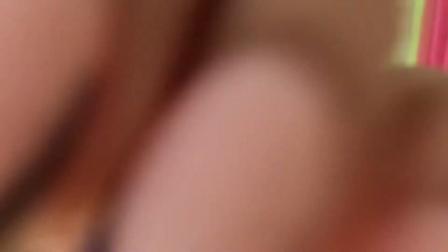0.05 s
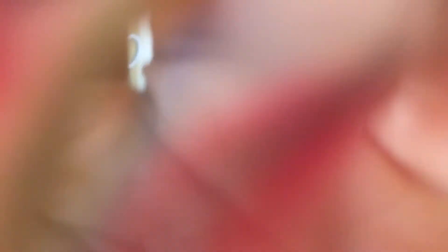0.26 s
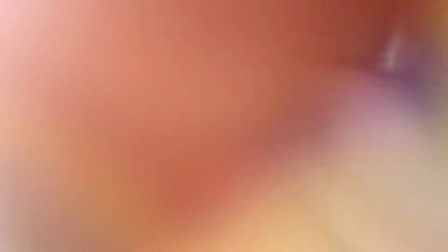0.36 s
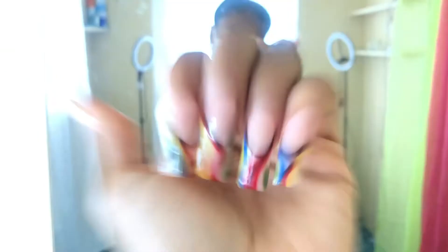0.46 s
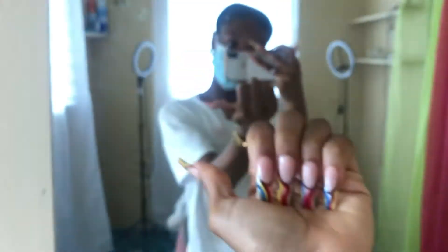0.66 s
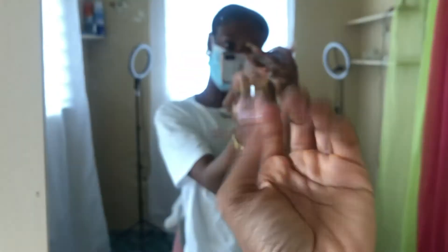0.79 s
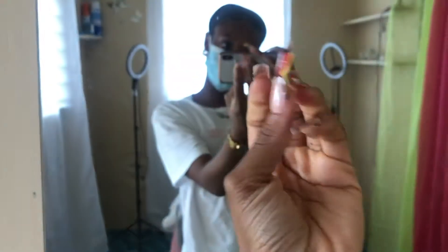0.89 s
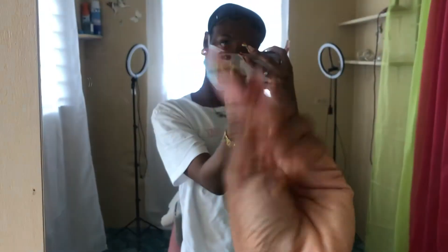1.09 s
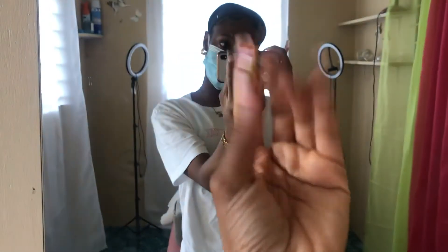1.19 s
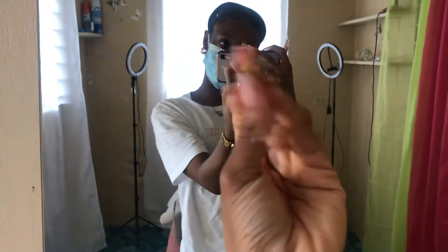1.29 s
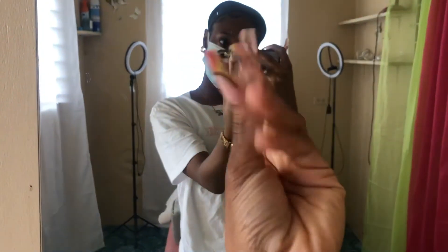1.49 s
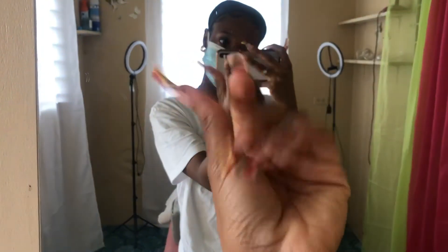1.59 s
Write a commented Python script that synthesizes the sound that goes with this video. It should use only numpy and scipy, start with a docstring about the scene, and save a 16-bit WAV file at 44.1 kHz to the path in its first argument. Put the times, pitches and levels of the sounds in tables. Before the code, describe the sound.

Long hard nails knock a phone in two rapid bursts, very close and clipping with low thuds and brief rubbing, then click sharply against each other in a small room over faint hiss and hum.

```python
"""Acrylic nails on a phone

Long nails knock and brush on a phone in two quick flurries, then click against each other in front of it.
Damped modes and noise make each crack; firmer knocks add dispersive bending waves in the phone body.
Airborne clicks leave a bright decaying-noise room tail; filtered noise gives the sliding and rocking,
and the background of rising hiss, low fan hum and faint narrow whistles."""
import sys
import numpy as np
from scipy import signal
from scipy.fft import rfft, irfft
from scipy.io import wavfile
from scipy.ndimage import uniform_filter1d

SR = 44100
rng = np.random.default_rng(int(sys.argv[2]) if len(sys.argv) > 2 else 0)


def to_wav(s):
    """Save 16-bit WAV."""
    ch = np.atleast_2d(s).T  # columns
    pcm = np.round(np.clip(ch, -1, 1) * 32767)  # PCM
    wavfile.write(sys.argv[1], SR, pcm.astype(np.int16))


N = 72765


def amp(db):
    """Decibel law: 20 dB is a factor of ten in amplitude."""
    return 10 ** (np.asarray(db) / 20)


def evened(x):
    """Normalisation to unit root-mean-square."""
    return x / np.sqrt(np.mean(x ** 2) + 1e-20)


def read(points, hz):
    """Interpolation of a curve along a logarithmic frequency axis."""
    point_hz, value = np.transpose(points)
    return np.interp(np.log(hz + 1), np.log(point_hz + 1), value)


def level(curve):
    """Envelope: amplitude over time from straight lines in decibels."""
    s, db = np.transpose(curve)
    return amp(np.interp(np.arange(N) / SR, s, db))


def add(mix, s, sound):
    """Superposition: a sound sums into the mix from a start in seconds, cut at the end."""
    part = mix[max(round(s * SR), 0):][:len(sound)]
    part += sound[:len(part)]


def noise(colour):
    """Spectral shaping: white noise weighted to a given spectrum, at unit rms."""
    spectrum = rfft(rng.standard_normal(N))
    weight = amp(read(colour, np.fft.rfftfreq(N, 1 / SR)))
    return evened(irfft(spectrum * weight, N))


# Spectrum of the background hiss. Each row: frequency in Hz, relative level in dB.
HISS_SPECTRUM = [(180, -26), (300, 1.5), (456, -2), (504, -6), (793, -4.5), (1600, -10), (2840, -15),
                 (3140, -16), (14400, -26), (16500, -31.5)]
HISS_START_DB, HISS_RISE_DB = -61, 5  # rms level at the start, and its rise by the end


def hiss():
    """Stationary broadband noise under a slowly rising envelope."""
    return level([(0, HISS_START_DB), (N / SR, HISS_START_DB + HISS_RISE_DB)]) * noise(HISS_SPECTRUM)


# Spectrum of a distant fan's rumble. Each row: frequency in Hz, relative level in dB.
HUM_SPECTRUM = [(15, -68.5), (25, -32.5), (40, -21.5), (59, 3.5), (92, -2.5), (118, 3.5), (178, -7.5),
                (292, -11.5), (348, -19.5), (377, -15), (400, -23), (520, -49), (880, -120)]
# Loudness of the rumble. Each row: time in seconds, rms level in dB.
HUM_LEVEL = [(0, -64), (.15, -61.5), (.5, -62.5), (.65, -59), (.78, -52), (1.2, -50), (1.65, -52)]


def fan_hum():
    """Low-frequency noise with spectral peaks: the rumble of a distant fan."""
    return level(HUM_LEVEL) * noise(HUM_SPECTRUM)


# Faint narrow whistles. Each row: start in seconds, length in seconds, centre in Hz, width of the
# resonator poles in Hz, rms level before the swell in dB.
WHISTLES = [(.45, .28, 2650, 380, -62), (1., .1, 2800, 40, -58), (1.13, .17, 2450, 120, -63),
            (1.13, .1, 2780, 100, -64), (1.46, .24, 2830, 200, -60), (1.53, .14, 2400, 60, -62),
            (.52, .11, 5800, 300, -62), (.222, .025, 1750, 250, -43)]


def whistles():
    """Narrow-band modulation: low-passed complex noise shifted up to a carrier, swelling and fading."""
    out = np.zeros(N)
    for s, length, hz, width, db in WHISTLES:
        t = np.arange(0, length, 1 / SR)
        pole = np.exp(-np.pi * width / SR)
        complex_noise = rng.standard_normal((N, 2)) @ [1, 1j]
        # the end of the filtered noise is taken, clear of the filter's onset
        fuzz = signal.lfilter([1], [1, -2 * pole, pole * pole], complex_noise)[-len(t):]
        whistle = evened((fuzz * np.exp(2j * np.pi * hz * t)).real)
        swell = np.sin(np.pi * t / length) ** 0.21
        add(out, s, amp(db) * whistle * swell)
    return out


# Spectrum of the case rocking in the hand. Each row: frequency in Hz, relative level in dB.
ROCKING_SPECTRUM = [(25, -14), (50, -0.5), (100, -7.5), (190, -0.5), (280, -4), (500, -42)]
# Strength of the rocking. Each row: time in seconds, rms level in dB.
ROCKING_LEVEL = [(0.17, -51.5), (0.188, -62), (0.226, -27.5), (0.276, -85), (0.314, -76), (0.36, -29.5),
                 (0.398, -26), (0.458, -44.5), (0.502, -104), (0.52, -55)]


def rocking():
    """Low-frequency rigid motion of the case in the hand, as enveloped noise."""
    curve = [(0.035, -104)] + list(ROCKING_LEVEL) + [(.56, -99)]
    return level(curve) * noise(ROCKING_SPECTRUM)


# Spectrum of skin and nail sliding on the case. Each row: frequency in Hz, relative level in dB.
RUB_SPECTRUM = [(120, -20.5), (200, -8.5), (909, -10), (1270, -11.5), (1730, -6.5), (2050, -12.5),
                (3630, -12), (7060, -7.5), (15000, -27.5), (16500, -37.5)]
# Strength of the sliding. Each row: time in seconds, rms level in dB.
RUB_LEVEL = [(0, -46), (.06, -64.5), (.12, -99), (.205, -60.5), (.214, -34), (.221, -47.5), (.224, -35.5),
             (.256, -40), (.29, -57), (.345, -65.5), (.36, -39), (.4, -34), (.425, -41), (.445, -52),
             (.5, -74.5)]
RUB_GRAIN_DB = 1.5  # rms depth of the level flutter


def rub():
    """Friction noise: sliding of skin and nail on the case, roughened by random amplitude modulation."""
    grain = evened(uniform_filter1d(rng.standard_normal(N), size=60))
    return level(RUB_LEVEL) * evened(noise(RUB_SPECTRUM) * amp(RUB_GRAIN_DB * grain))


# Decay of the room. Each row: frequency in Hz, time to fall by 60 dB in seconds.
ROOM_T60 = [(2000, 0.23), (6000, 0.25), (14000, 0.19)]
# Colour of the room tail at its start. Each row: frequency in Hz, relative level in dB.
ROOM_COLOUR = [(1000, -20.5), (2000, -10), (4500, -5), (8000, -5), (12000, 0), (15500, -9), (16500, -23.5)]
ROOM_DB = 1.85  # root of the tail's summed squares
ROOM_TINT = .6  # how far the tail tilts toward the crack's pitch


def room_tail(crack_hz):
    """Diffuse reverberation: noise whose bands decay exponentially, tilted toward the crack's pitch."""
    hz, t, bands = signal.stft(rng.standard_normal(SR // 3), SR, nperseg=128)
    tilt = ((hz + 1) / 8000) ** (ROOM_TINT * np.log2(crack_hz / 8000))
    decay_db = 60 * t / read(ROOM_T60, hz)[:, None]
    gain = amp(read(ROOM_COLOUR, hz)[:, None] - decay_db)
    tail = signal.istft(bands * tilt[:, None] * gain, SR, nperseg=128)[1]
    return amp(ROOM_DB) * tail / np.linalg.norm(tail)


TICK_RISE_MS, TICK_FADE = 0.037, 1.3  # rise time constant; decay time constant per tabled length
TICK_OCT = 0.62  # spread in octaves of the excitation about the crack's centre
TICK_NOISE_DB, CHATTER_DB, CHATTER_MS = -6.5, -18.5, 0.98  # noise in the crack; longer chatter and its decay
CRACK_LOW_HZ = 1250  # high-pass corner


def tick(db, hz, length_ms, modes):
    """Modal impact: the struck thing's modes near the crack's centre ring briefly over noisy chatter."""
    ms, f = np.arange(512) * 1000 / SR, np.fft.rfftfreq(512, 1 / SR) + 1
    shape = (1 - np.exp(-ms / TICK_RISE_MS)) * np.exp(-ms / (TICK_FADE * length_ms))

    def near(at_hz):
        """Excitation spectrum: a Gaussian in octaves over a small floor."""
        return np.exp(-.5 * (np.log2(at_hz / hz) / TICK_OCT) ** 2) + 0.14

    mode_hz, mode_db = np.transpose(modes)[:, :, None]
    # each strike shifts the modes' pitch, phase and level at random
    detune, phase, sway = rng.standard_normal((3, len(modes), 1))
    turns = mode_hz * (1 + 0.056 * detune) * ms / 1000 + phase
    mode_gain = near(mode_hz) * amp(mode_db + 4.4 * sway)
    ring = (mode_gain * np.sin(2 * np.pi * turns)).sum(0)
    grit = evened(irfft(rfft(rng.standard_normal(512)) * near(f) * amp(read(modes, f)), 512))
    crack = shape * (evened(ring) + amp(TICK_NOISE_DB) * grit)
    crack = crack + amp(CHATTER_DB) * np.exp(-ms / CHATTER_MS) * grit
    crack = signal.lfilter(*signal.butter(2, CRACK_LOW_HZ, "high", fs=SR), crack)
    return amp(db) * crack / abs(crack).max()


ROOM_GAP_MS = 1  # room tail's delay after the tabled start


def cracks(table, modes):
    """Direct and reverberant field: all cracks of a table, and apart from them a room tail for each."""
    dry, wet = np.zeros((2, N))
    for s, db, hz, length_ms in table:
        add(dry, s + .0001, tick(db, hz, length_ms, modes))
        # a longer crack feeds the room more energy
        add(wet, s + ROOM_GAP_MS / 1000, amp(db) * np.sqrt(length_ms) * room_tail(hz))
    return dry, wet


# Nail striking nail in the air. Each row: start in seconds, peak level in dB, centre in Hz,
# length scale in ms.
CLICKS = [(0.5425, -25, 9300, 0.74), (0.5446, -22, 9000, 0.28), (0.5461, -32, 7600, 0.3),
          (0.5651, -38, 5800, 1.02), (0.5755, -38, 6500, 0.45), (0.6143, -35, 8000, 0.33),
          (0.6254, -44, 6600, 0.29), (0.6391, -38, 8100, 0.4), (0.8687, -23, 8800, 0.29),
          (0.8778, -10, 11000, 0.35), (0.879, -21, 10700, 0.3), (0.8818, -28, 9000, 0.51),
          (0.8836, -28, 10800, 0.53), (1.097, -8, 9500, 0.29), (1.0992, -12, 6800, 0.33),
          (1.1006, -19, 7700, 0.31), (1.1095, -17, 10500, 0.27), (1.1222, -21, 8500, 0.37),
          (1.1263, -13, 7200, 0.56), (1.1277, -23, 7300, 0.29), (1.306, -10, 7900, 0.31),
          (1.3186, -24, 7200, 0.5), (1.3455, -21, 10600, 0.55), (1.3478, -6, 10500, 0.56),
          (1.3493, -13, 10800, 0.3), (1.352, -11, 7400, 0.43), (1.3666, -26, 10400, 0.58)]
# Resonances of the nails. Each row: frequency in Hz, relative level in dB.
NAIL_MODES = [(2600, -8), (4800, 2), (7200, -1.5), (9400, -5.5), (12000, 2.5), (14500, -4)]


def air_clicks():
    """Airborne radiation: nail on nail, heard with its full room tail."""
    direct, room = cracks(CLICKS, NAIL_MODES)
    return direct + room


WAVE_LAW = .6  # exponent of phase against time
WAVE_ABOVE_OCT, WAVE_BELOW_OCT = 1.1, .13  # spread above and below the strongest pitch, in octaves
REBOUND_DB, REBOUND_SHARE = -10, .42  # rebound level; its pitch as a share of the strongest pitch


def body_wave(db, crest_ms, hz):
    """Bending-wave dispersion: treble arrives first, pitch falls as the swing grows; a rebound follows."""
    ms = np.arange(1, 3000) * 1000 / SR
    turns = 2 * (ms / crest_ms) ** WAVE_LAW
    pitch_hz = WAVE_LAW * turns / ms * 1000
    octaves = np.log2(pitch_hz / hz)
    swing = np.exp(-.5 * (octaves / np.where(octaves > 0, WAVE_ABOVE_OCT, WAVE_BELOW_OCT)) ** 2)
    after_ms = np.maximum(ms - ms[np.argmax(swing)], 0)
    rebound = -amp(REBOUND_DB) * np.exp(-after_ms / (3.0 * crest_ms))
    rebound = rebound * np.sin(2 * np.pi * REBOUND_SHARE * hz * after_ms / 1000)
    return amp(db) * (swing * np.cos(2 * np.pi * turns) + rebound)


# Bending waves after the firmer knocks. Each row: start in seconds, level in dB, time to the second
# crest in ms, strongest pitch in Hz, sign (1 for a push, -1 for a pull).
WAVES = [(.0, -33, 2.5, 500, 1), (.2073, -16, 1.1, 1200, 1), (.2123, -21, 1.5, 700, 1),
         (.2225, -24, 3.2, 420, -1), (.2457, -27, 1.2, 900, 1), (.2645, -36, 2.5, 600, 1),
         (.3546, -9, 1.6, 750, 1), (.3582, -5, 1.8, 700, 1), (.3594, -15, 1.0, 1500, -1),
         (.3654, -12, 1.75, 700, 1), (.3769, -1, 1.95, 500, 1), (.3861, 0.5, 1.95, 470, 1),
         (.4082, -5, 1.6, 570, 1), (.4177, -8, 1.65, 560, 1), (.4354, -26, 1.2, 800, 1),
         (.437, -30, 11., 110, 1), (.9018, -39, .7, 1900, 1)]


def body():
    """Linear superposition of all bending waves in the phone."""
    out = np.zeros(N)
    for s, db, crest_ms, hz, push in WAVES:
        add(out, s, push * body_wave(db, crest_ms, hz))
    return out


# Nail ticks on the phone. Each row: start in seconds, peak level in dB, centre in Hz, length scale in ms.
TICKS = [(0.0973, -40, 10600, 0.37), (0.1839, -39, 6500, 0.29), (0.189, -40, 6500, 0.62),
         (0.2005, -40, 7900, 0.5), (0.2071, 2, 6500, 0.34), (0.2105, -18, 5800, 0.28),
         (0.2121, 2, 7200, 0.4), (0.2455, -9, 6800, 0.21), (0.2518, -21, 7100, 0.83),
         (0.2651, -30, 4500, 0.31), (0.3144, -30, 4400, 0.31), (0.3312, -39, 9700, 0.3),
         (0.3347, -35, 5200, 0.44), (0.3419, -46, 5700, 0.52), (0.3463, -39, 5000, 0.29),
         (0.3544, 3, 9200, 0.32), (0.358, 3, 4900, 0.38), (0.3652, 0, 7300, 0.41), (0.3767, 2, 5100, 0.38),
         (0.3859, -3, 4100, 0.27), (0.3877, -13, 4600, 0.46), (0.3902, -4, 5900, 0.23),
         (0.3925, -17, 7700, 0.23), (0.3939, -17, 7000, 0.25), (0.4028, -12, 5600, 0.4),
         (0.408, -1, 4800, 0.28), (0.4164, -15, 5200, 0.28), (0.4175, -5, 7300, 0.36),
         (0.4232, -18, 3800, 0.35), (0.4352, -28, 2900, 0.35), (0.4545, -33, 8200, 0.28)]
# Resonances of the phone case. Each row: frequency in Hz, relative level in dB.
CASE_MODES = [(2500, -0.5), (3700, -3.5), (6300, -4.5), (8000, -8), (11000, -7.5), (14000, -8)]
PHONE_SEND_DB = -25.5  # gain of the room's answer to knocks on the phone


def phone_ticks():
    """Structure-borne impact: nails on the case, with only a weak room tail."""
    direct, room = cracks(TICKS, CASE_MODES)
    return direct + amp(PHONE_SEND_DB) * room


def scene():
    """Superposition of background, handling and nail sounds in one channel."""
    background = hiss() + fan_hum() + whistles()
    handling = rocking() + rub()
    nails = air_clicks() + body() + phone_ticks()
    return (background + handling + nails)[None]


def record(dry):
    """Saturation and band limiting: the hardest knocks clip, then a low-pass cuts at 16.5 kHz."""
    clipped = np.clip(dry, -.97, .97)
    low_pass = signal.firwin(255, 16500, window=("kaiser", 9), fs=SR)
    return signal.oaconvolve(clipped, low_pass[None], "same")


dry = scene()
out = record(dry)
to_wav(out)
```